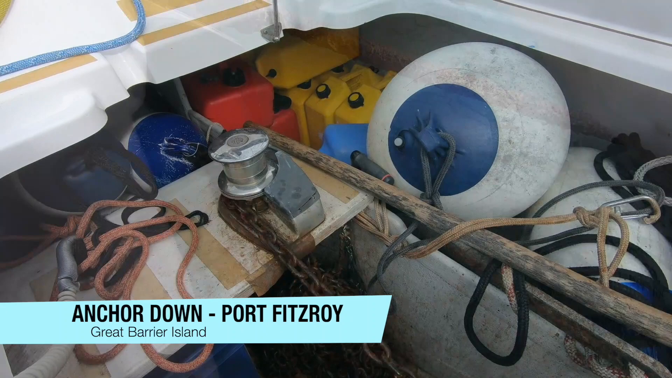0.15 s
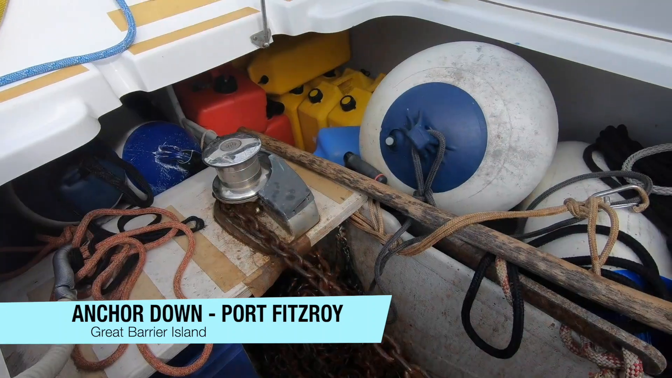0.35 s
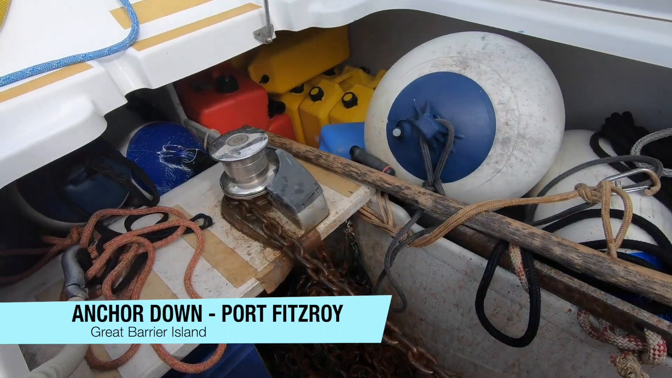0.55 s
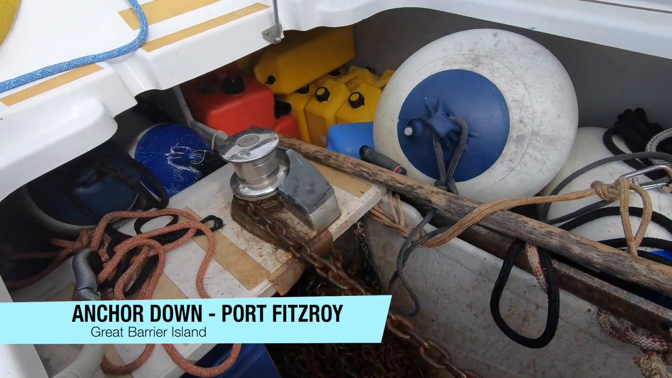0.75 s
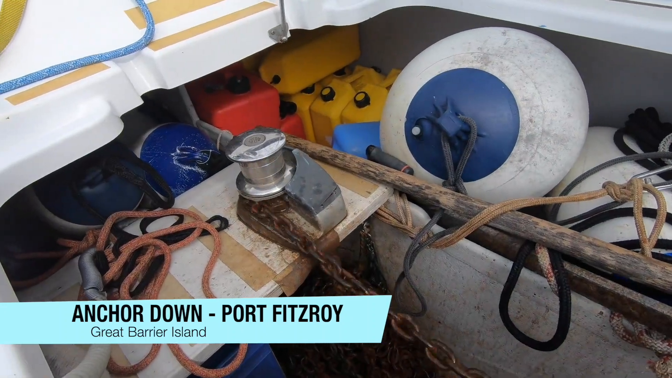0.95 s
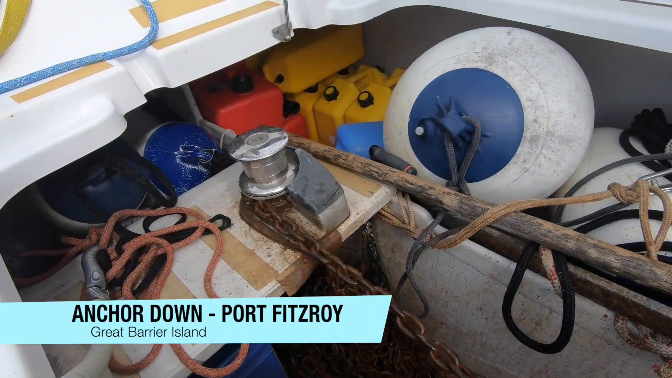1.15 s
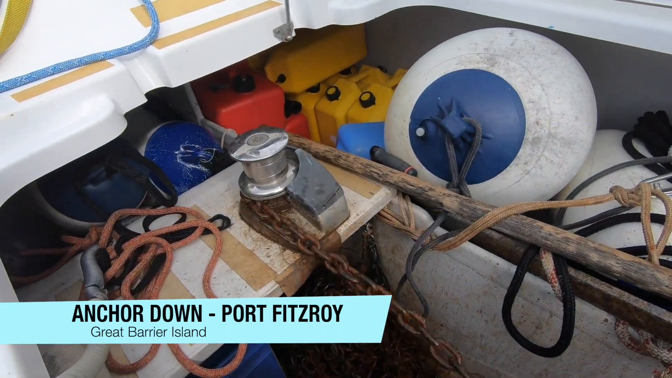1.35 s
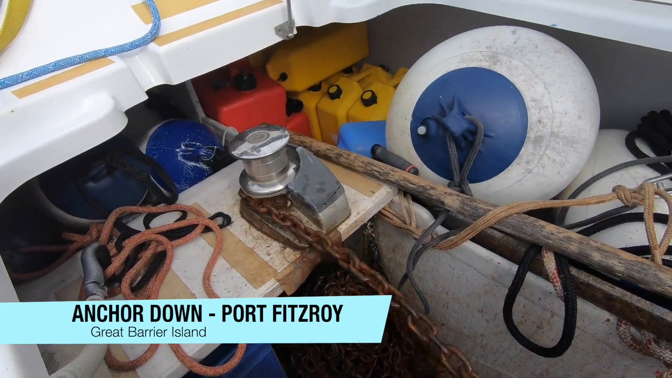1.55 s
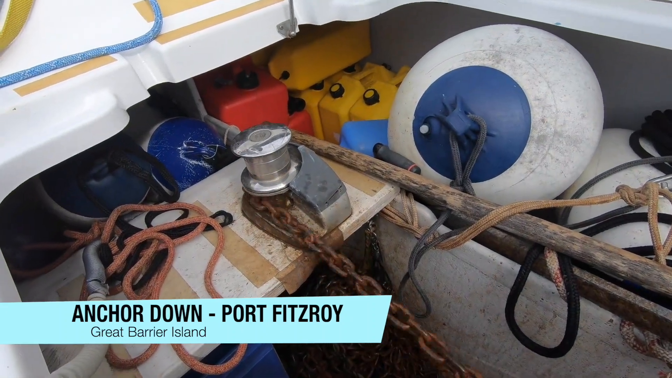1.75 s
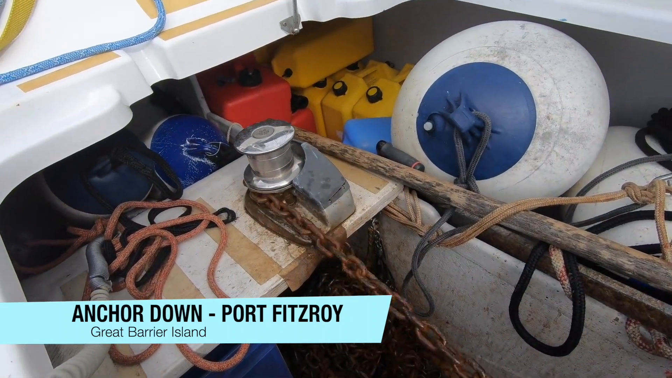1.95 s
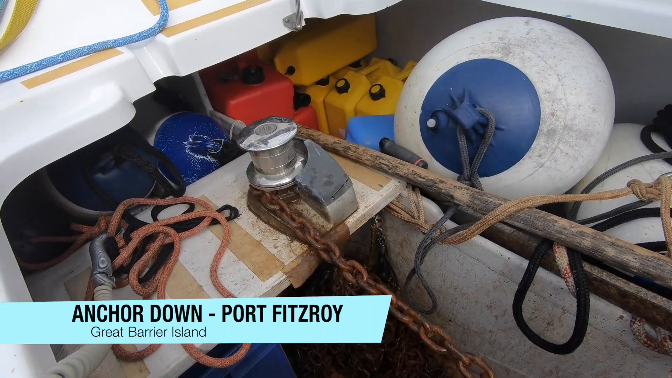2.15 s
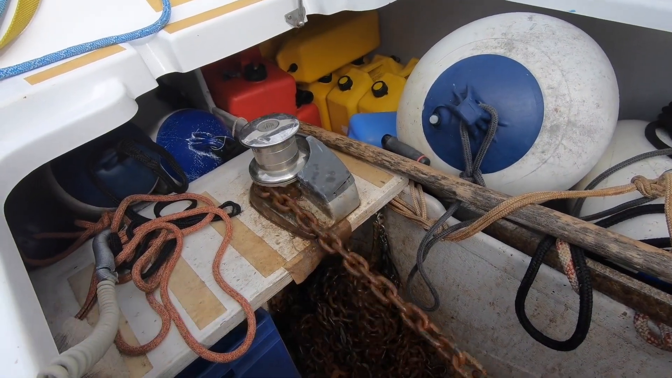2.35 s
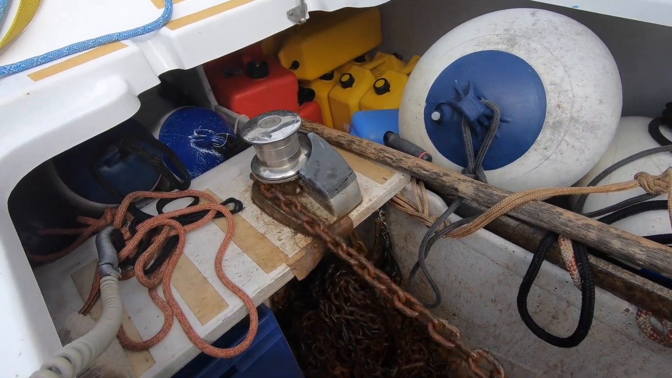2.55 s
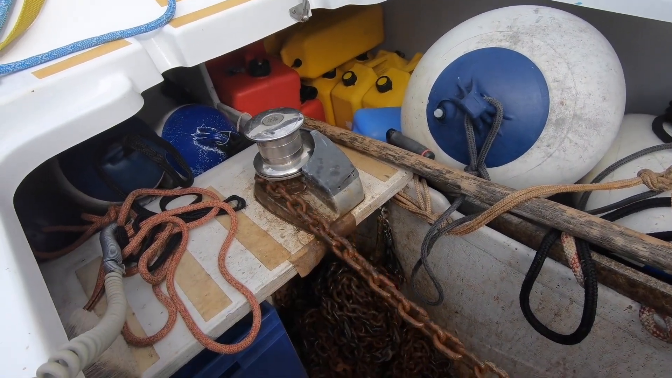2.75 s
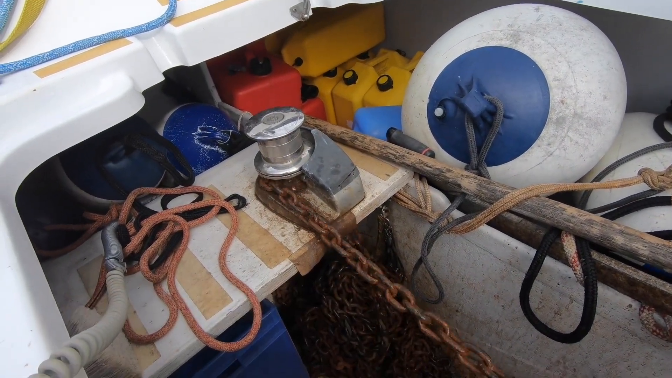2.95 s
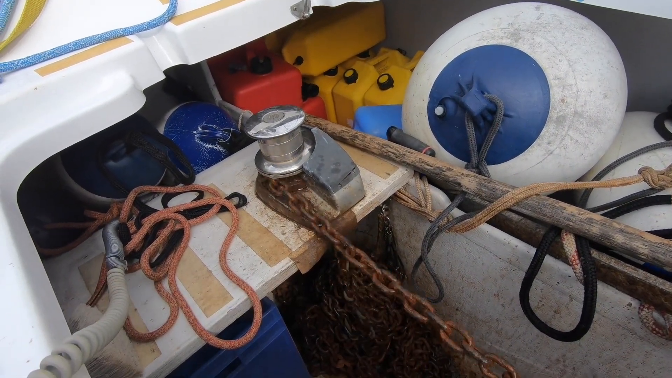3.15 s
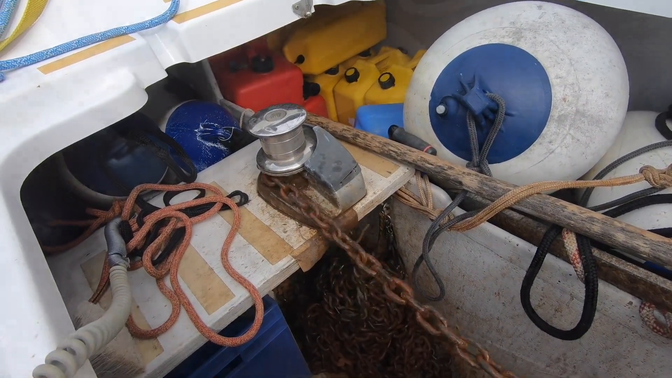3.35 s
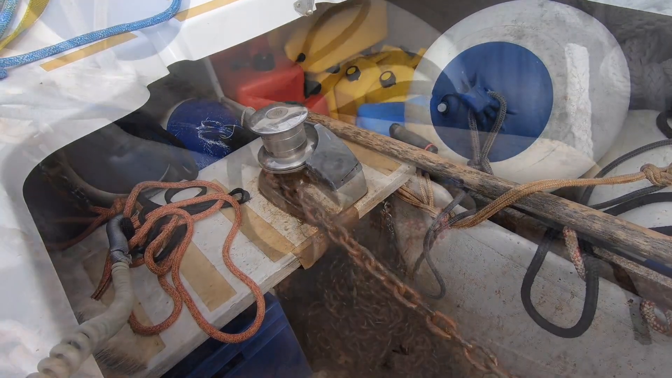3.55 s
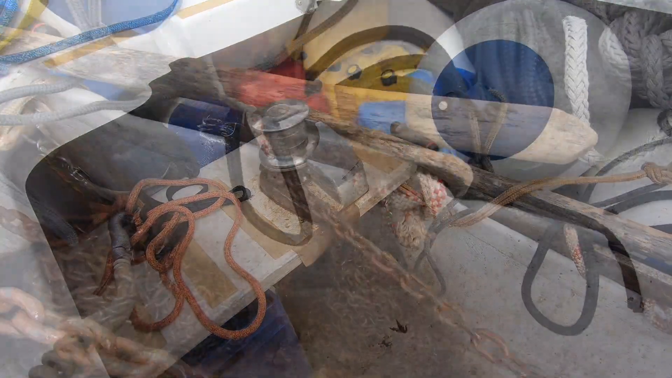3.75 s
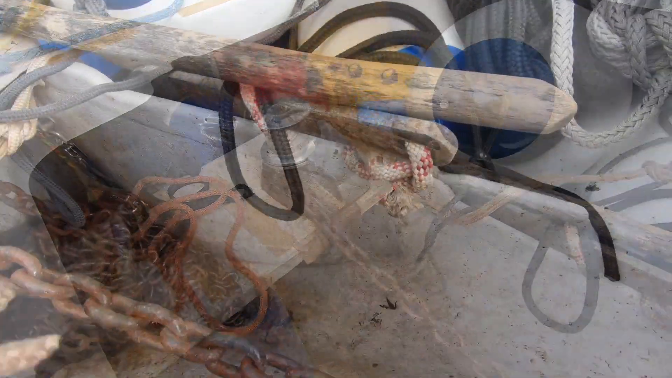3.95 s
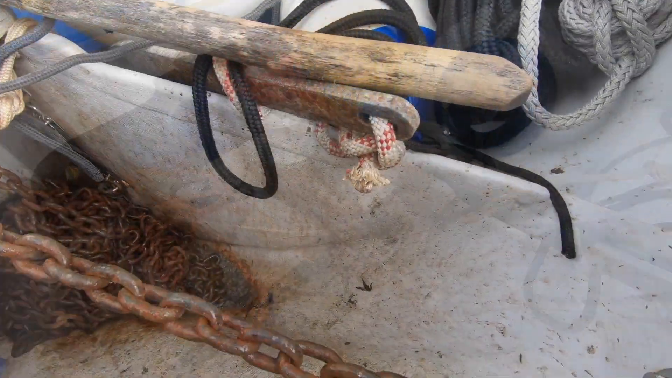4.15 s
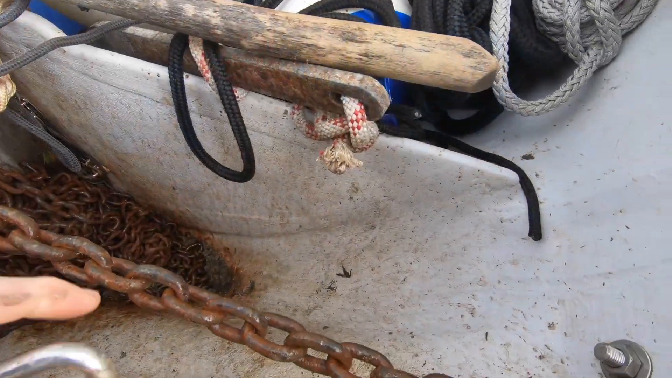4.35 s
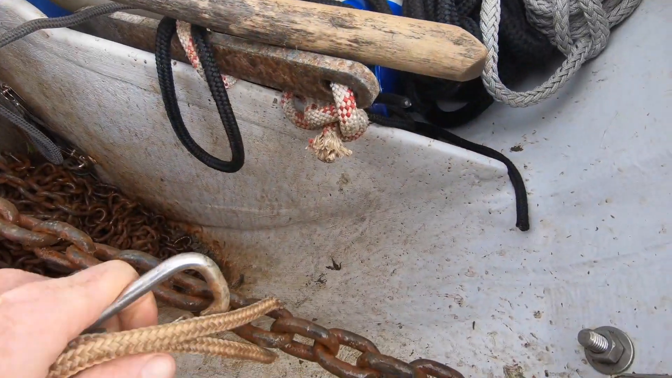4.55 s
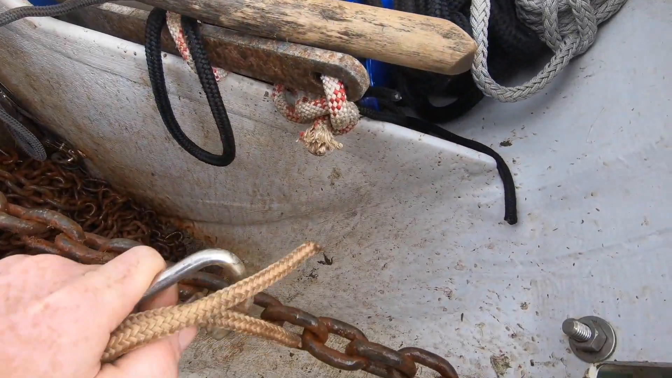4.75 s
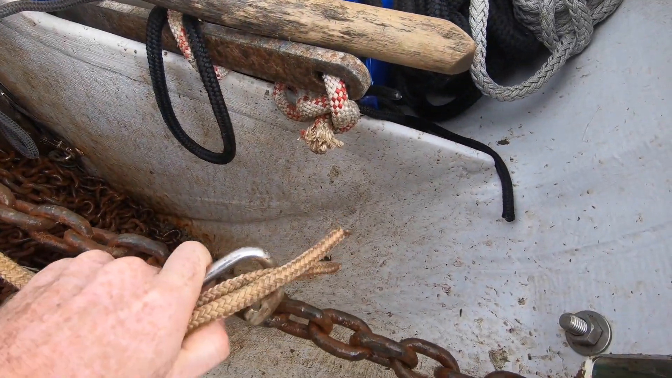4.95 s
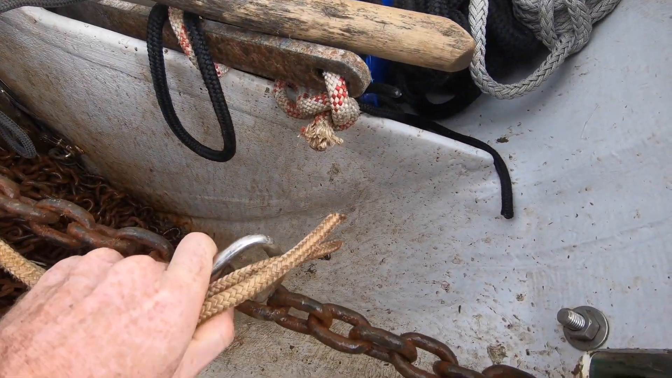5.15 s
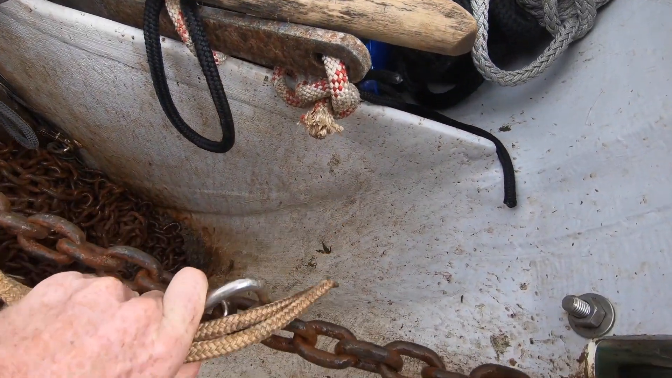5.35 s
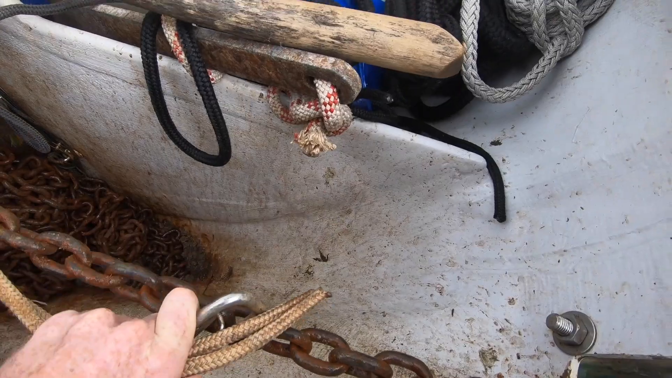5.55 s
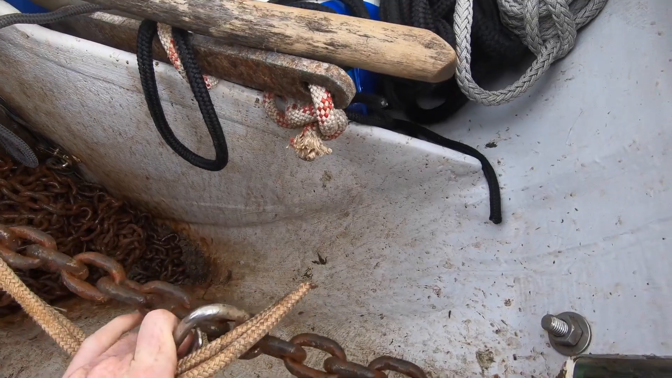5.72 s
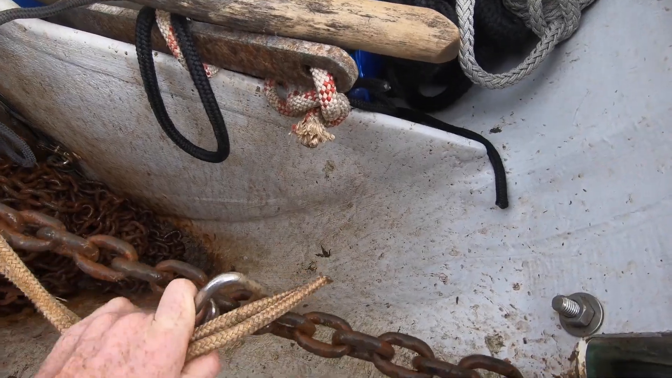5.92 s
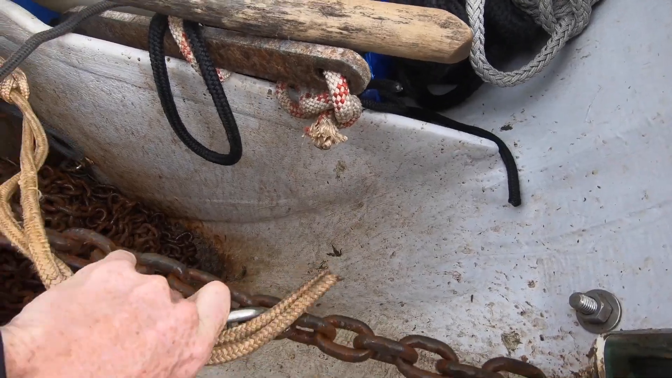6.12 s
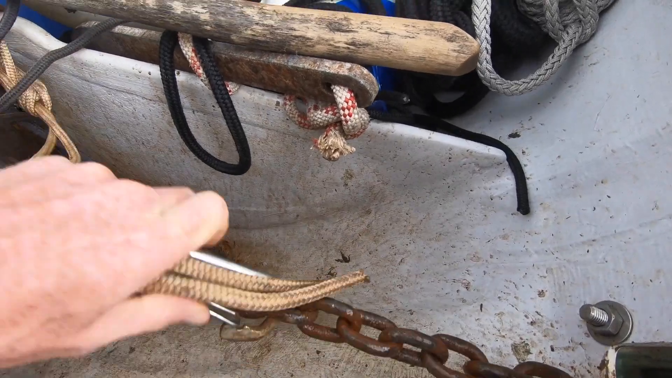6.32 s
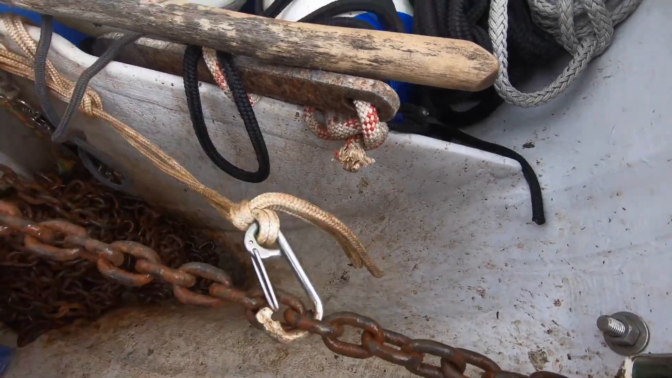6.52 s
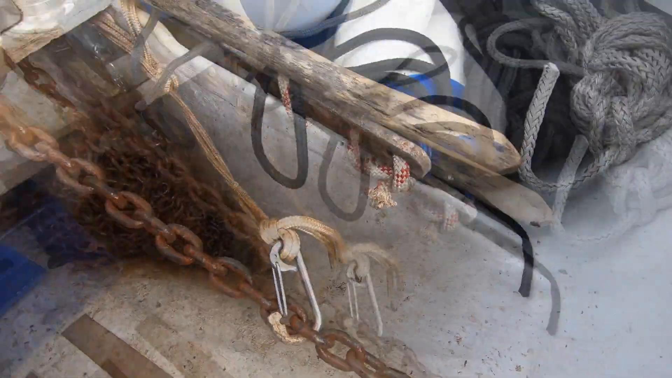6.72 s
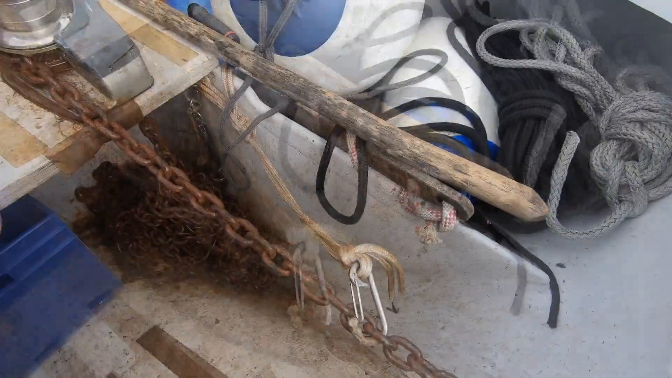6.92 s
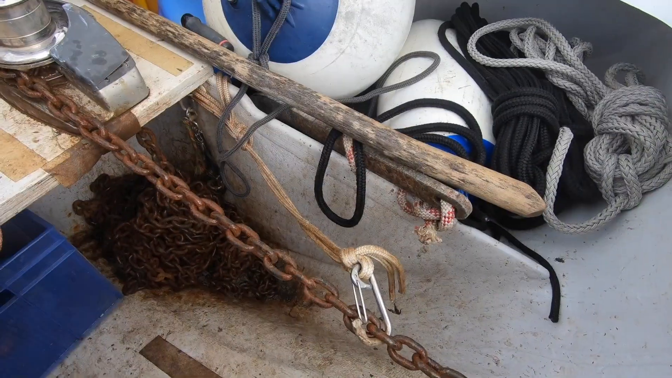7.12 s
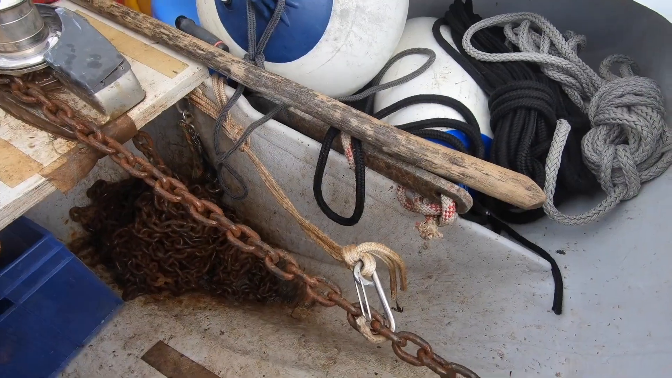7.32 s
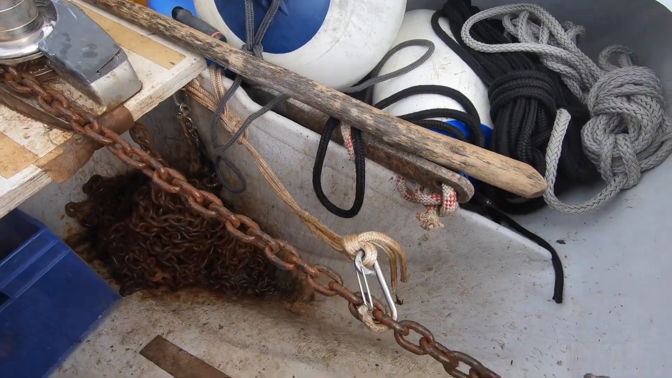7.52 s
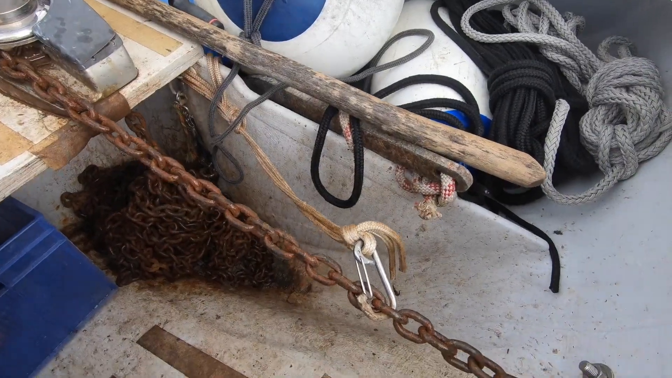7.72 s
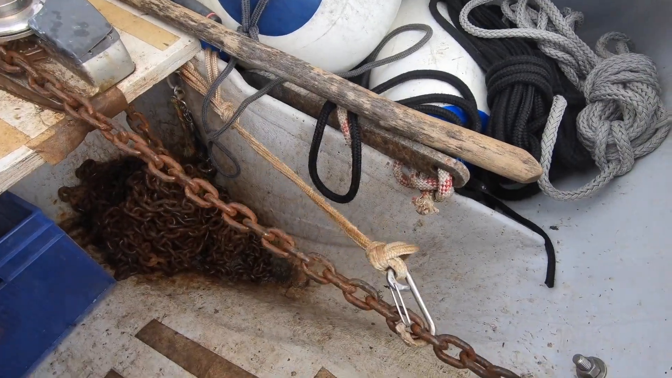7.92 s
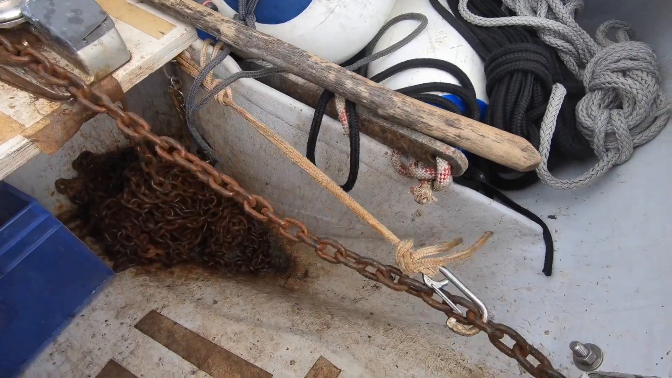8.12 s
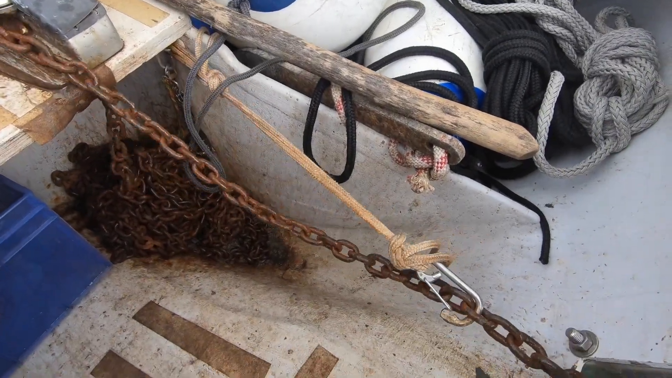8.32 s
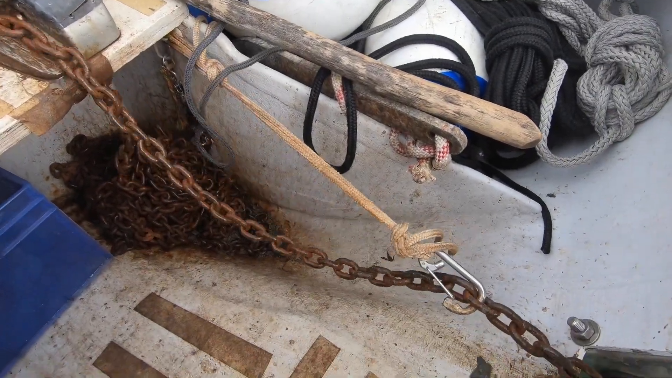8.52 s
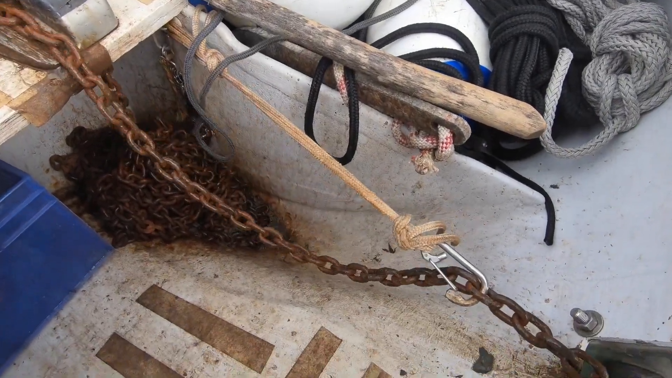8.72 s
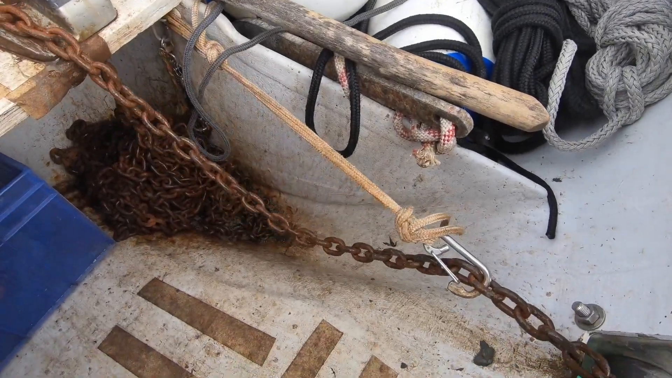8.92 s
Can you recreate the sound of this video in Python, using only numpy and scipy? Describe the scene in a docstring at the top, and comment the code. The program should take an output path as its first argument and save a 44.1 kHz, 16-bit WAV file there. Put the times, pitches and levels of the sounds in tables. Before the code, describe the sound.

Heavy chain rattles and knocks over a rumbling idle, slackens to rope rustle and a squeaky metal snap, then a motor whines and chain slides.

```python
"""Rusty anchor chain clatters and scrapes out of a boat's foredeck well, close below the microphone.
An electric windlass pays it out: links knock off the gypsy as struck modes, many small contacts
make the drag, and filtered noise booms in the hull with the humming motor over an idling engine.
In a pause rope rustles and a steel snap hook is clipped on with a squeak and a rattle of short rings;
then the motor whines up, and the chain runs again briefly and slides on."""
import sys
import numpy as np
from scipy import signal
from scipy.fft import rfft, irfft
from scipy.io import wavfile
from scipy.ndimage import uniform_filter1d, minimum_filter1d, map_coordinates

SR = 44100
rng = np.random.default_rng(int(sys.argv[2]) if len(sys.argv) > 2 else 0)


def store_wav(level_fs):
    """Save 16-bit WAV to argv[1]."""
    pcm = np.round(np.clip(np.atleast_2d(level_fs), -1, 1) * 32767)
    wavfile.write(sys.argv[1], SR, pcm.T.astype(np.int16))


N = 400413
TIME = np.arange(N) / SR
RING = np.arange(int(.3 * SR)) / SR  # time base of one struck sound

# the moving chain, one table a run: (t/s, relative drag level/dB, relative rusty scrape level/dB)
CHAIN_RUNS = [
    [(0, -20.5, -31), (.28, -24.5, -38.5), (.55, -21, -33.5), (1, -24, -36.5), (1.45, -20, -33.5),
     (2, -23.5, -37), (2.75, -24.5, -39), (3.3, -23, -35), (3.6, -28, -46), (3.85, -31, -48),
     (4.15, -38.5, -51.5), (4.4, -66, -72)],
    [(7.745, -54, -57), (7.78, -38, -53), (7.83, -27, -43), (7.92, -23, -41), (8.05, -20, -36.5),
     (8.19, -24, -38), (8.3, -27.5, -36), (8.45, -27.5, -38), (8.56, -28, -37), (8.66, -27.5, -37),
     (8.76, -29, -41), (8.87, -26.5, -43.5), (9.08, -32.5, -39.5)],
]
# the louder links strike gypsy, deck and each other:
# (t/s, then relative level/dB of thud, clack, gypsy ring, snap, crack)
LINK_KNOCKS = [(0.044, -33, -33, -22.5, -34, -56), (0.071, -39, -42, -57.0, -40.0, -34),
               (0.119, -24, -24.5, -23, -24.5, -32.5), (0.178, -27, -22, -31, -41, -56),
               (0.2, -26, -38, -55.0, -32.5, -41), (0.266, -26, -34, -56.0, -40, -43),
               (0.345, -22.5, -24, -31, -29.5, -29), (0.375, -27.0, -22, -21, -40, -58),
               (0.413, -23.5, -25, -33, -37.5, -54), (0.45, -16, -24, -40.0, -26.5, -30.5),
               (0.505, -26, -17.5, -27, -22, -27.5), (0.531, -29.5, -24, -30, -27, -44),
               (0.555, -36, -38, -42.0, -41, -47), (0.597, -20.5, -20.5, -40, -28.5, -34),
               (0.647, -25, -45, -55.0, -47, -54), (0.689, -34.0, -25, -23, -38, -53),
               (0.717, -24.5, -26.5, -22.5, -26.5, -33), (0.777, -21, -23.5, -42, -28, -35.5),
               (0.811, -19.5, -26, -47, -28.5, -34), (0.836, -18.5, -26, -32, -34, -39),
               (0.887, -30, -22, -24, -34, -52), (0.919, -18, -14.5, -23, -23, -32.5),
               (0.959, -24, -27, -38, -31, -31.5), (1.011, -26, -21.5, -19, -27, -44),
               (1.03, -27, -22, -22, -29, -40), (1.061, -30, -32, -48.0, -40, -38),
               (1.086, -33, -24, -29, -30.5, -57), (1.13, -21.5, -20, -30, -26.5, -32),
               (1.181, -31, -39, -56.0, -38, -36), (1.199, -40, -33, -56.0, -32, -39),
               (1.236, -21.5, -26, -28, -31, -36), (1.274, -30.5, -23.5, -26, -28, -55),
               (1.298, -24, -31, -48, -46, -40), (1.327, -27, -19.5, -24, -23.5, -41),
               (1.362, -39, -41, -44.0, -31, -46.5), (1.407, -31, -23, -27, -28, -39),
               (1.476, -21.5, -19.5, -27.5, -31, -42), (1.518, -33.0, -35, -49.0, -41, -43),
               (1.547, -29, -32, -45.0, -25.5, -28), (1.625, -32, -22, -26.0, -35, -57),
               (1.65, -17.5, -19.5, -20, -29, -30), (1.682, -23, -37, -45.0, -30, -37),
               (1.702, -29, -39, -52.0, -27.5, -34), (1.756, -18.5, -19.5, -36, -25.5, -31.5),
               (1.819, -27, -25, -21.5, -42, -58), (1.869, -24, -27, -40, -30, -34.5),
               (1.881, -21, -21, -27, -26, -33), (1.958, -26, -25, -20.5, -27.5, -49),
               (2.059, -29, -22.0, -25.5, -29.5, -60), (2.107, -23.5, -24, -46, -29.5, -32.5),
               (2.161, -25, -28.5, -44.0, -50, -43), (2.216, -20, -36, -46, -36, -37.5),
               (2.239, -24.5, -35, -44.0, -40, -38), (2.27, -32, -42, -57.0, -42, -47),
               (2.297, -23.5, -17, -37, -30, -53), (2.355, -42, -25, -38, -31, -37),
               (2.412, -23, -25.5, -44.0, -34.5, -50), (2.464, -35, -20, -20.5, -27, -43),
               (2.505, -21.5, -25, -42.0, -39, -49), (2.603, -30, -30, -42, -29.5, -34),
               (2.631, -36, -29, -41, -46, -55.0), (2.673, -21, -23.5, -46, -30.5, -31.5),
               (2.749, -35, -38, -47, -42, -42), (2.789, -35, -24.5, -25, -34, -44),
               (2.821, -28, -40, -49.0, -31.5, -38.5), (2.845, -20, -17.5, -37, -31.5, -40),
               (2.949, -30, -31, -49.0, -50.0, -53.0), (2.971, -17, -15.5, -40, -30.5, -34.5),
               (3.005, -24, -23, -26, -31, -31.5), (3.054, -43, -32, -42, -52, -58),
               (3.095, -27, -23.5, -35.0, -29.5, -29), (3.181, -27, -25.5, -41.0, -32.0, -36),
               (3.257, -21, -19.5, -35.0, -26, -34), (3.314, -47, -41, -49, -52, -37.5),
               (3.371, -22.5, -24, -41, -28, -28), (3.438, -42, -37, -47, -38, -50),
               (3.459, -39, -32, -56.0, -38.0, -39), (3.481, -40, -45, -55.0, -38, -49),
               (3.52, -34, -38, -49.0, -39, -39), (3.546, -21.5, -23.5, -45, -30.5, -55),
               (3.587, -27, -22.5, -41, -27.5, -38), (3.659, -31, -25, -31, -33.5, -50),
               (3.701, -23, -21.5, -39.0, -37.5, -48), (3.72, -25, -35, -47.0, -37, -37),
               (3.787, -34, -39, -55, -56.0, -65), (3.841, -41, -35, -52.0, -45, -58),
               (3.881, -30, -32, -41, -42.0, -47), (3.911, -36, -36, -50, -45, -59),
               (3.959, -32, -37, -54.0, -37, -41), (4.001, -41, -32, -31, -38, -50.0),
               (4.035, -24, -29, -45.0, -38, -41.5), (4.135, -48, -36.5, -40, -47, -56),
               (4.235, -53, -47, -45, -53, -68), (4.958, -59, -47.5, -64.0, -46, -51),
               (5.045, -49, -56, -72.0, -51, -53.0), (5.36, -32, -43, -59.0, -46, -51.0),
               (5.414, -23.5, -30.5, -42, -40, -58), (5.613, -32.5, -47, -61.0, -59, -69),
               (5.708, -27.5, -29, -46, -29.5, -43.5), (5.721, -25, -36, -51, -37, -56),
               (5.857, -27, -34.5, -55, -42, -47.5), (5.872, -33, -36, -57, -41, -46.5),
               (6.032, -28, -27.5, -45, -26, -28.5), (6.056, -21.5, -21, -34, -22.5, -24),
               (6.088, -24.5, -18, -25, -33, -54), (6.246, -42, -44, -43, -47, -46.5),
               (6.299, -36, -45, -57, -48, -35), (6.456, -39, -33, -44, -47, -61),
               (6.479, -28.5, -53, -57.0, -67, -67.0), (6.596, -45, -45.5, -67, -44.5, -61),
               (7.749, -38, -57, -66, -49, -60), (7.764, -27, -48, -59.0, -49, -57),
               (7.85, -20, -23, -44, -29, -41), (7.931, -18.5, -35, -45, -37, -51),
               (7.96, -20, -22, -36, -29.5, -36), (7.979, -23, -23, -42, -29, -34),
               (8.079, -19, -30, -42, -33, -34), (8.124, -17, -21.5, -32, -22, -36),
               (8.135, -23, -37, -39, -33, -50), (8.223, -26, -24, -41, -28, -33),
               (8.491, -30, -40, -53.0, -39, -35.5), (8.566, -23.5, -26.5, -46, -38, -40.0),
               (8.826, -23, -30, -44.0, -48, -45), (8.851, -21.5, -27.5, -39, -36, -49)]
# the bands of a knock's thud, clack, snap and crack, from edges f/Hz
KNOCK_FILTERS = [signal.butter(3, edges, "band", fs=SR, output="sos")
                 for edges in [(130, 800), (800, 2350), (2350, 4800), (4800, 16000)]]


def amp(db):
    """Amplitude factor of a level in dB."""
    return 10 ** (np.asarray(db) / 20)


def unit(x):
    """Scales x to unit RMS."""
    return x / np.sqrt(np.mean(x ** 2) + 1e-20)


def add(mix, s, sound):
    """Lays a sound into the mix from s seconds on."""
    part = mix[max(round(s * SR), 0):][:len(sound)]
    part += sound[:len(part)]


def delayed(x, s):
    """The same sound, s seconds later."""
    return np.pad(x, (max(int(s * SR), 0), 0))[:len(x)]


def level(rows, column=1):
    """Gain that follows a dB column, practically silent outside its rows."""
    rows = np.array(rows)
    return amp(np.interp(TIME, rows[:, 0], rows[:, column], left=-120, right=-120))


def envelope(start, length, rise_s, fall_s):
    """Attack, hold and release, curved over at the top."""
    hold_from = start + min(rise_s, length / 2)
    hold_to = start + max(length - fall_s, length / 2)
    edge = np.interp(TIME, [start, hold_from, hold_to, start + length], [0, 1, 1, 0])
    return edge * (2 - edge)


def colour(x, spectrum):
    """Filters x by a spectrum in minimum phase, without smearing attacks backwards."""
    hz, db = np.transpose(spectrum)
    f = abs(np.fft.fftfreq(4096, 1 / SR))
    log_gain = np.log(amp(np.interp(np.log(f + 1), np.log(hz), db)))
    taps = np.fft.ifft(np.exp(np.conj(signal.hilbert(log_gain)))).real
    return signal.oaconvolve(x, taps)[:len(x)]


def band(x, lo_hz, hi_hz, order=3):
    """Keeps the band between two frequencies."""
    return signal.sosfilt(signal.butter(order, [lo_hz, hi_hz], "band", fs=SR, output="sos"), x)


def wander(rate):
    """Smooth chance of unit size with rate random knots a second, held in steps of 64 samples."""
    knots = rng.standard_normal(2000)
    curve = map_coordinates(knots, [TIME[::64] * rate], order=3, mode="wrap")
    return unit(curve).repeat(64)[:N]


def ring(modes, scatter, uneven_db):
    """Dying modes; each blow excites them differently and detunes them a little."""
    hz, db, t60 = np.transpose(modes)[:, :, None]
    detune, strength, phase = rng.standard_normal((3, len(modes), 1))
    waves = np.sin(2 * np.pi * (hz * (1 + scatter * detune) * RING + phase))
    decay = np.exp(-np.log(1000) * RING / t60)
    return (amp(db + uneven_db * strength) * decay * waves).sum(0)


def contacts(count, per_s, spread_db):
    """Random metal contacts of very unequal size and either sign."""
    chance = rng.random(count)
    size = rng.exponential(1, count)
    sign = rng.choice([-1, 1], count)
    return (chance < per_s / SR) * sign * amp(spread_db * np.minimum(size, 4))


def landing(lead_s, fall_s, per_s):
    """Contacts swell as metal slides home (at lead_s), then die away."""
    since = RING - lead_s
    shape = np.exp(np.where(since < 0, 4 * since / lead_s, -since / fall_s))
    return contacts(len(RING), per_s, spread_db=2.0) * shape


def response(modes_db=-4, t60=0.13, early_db=-3, early_t60=0.016, scatter=0.0047):
    """One contact heard in the well: dense close reflections and the ring of windlass and deck."""
    # spectrum of the well's reflections: (f/Hz, relative level/dB per Hz)
    well_spectrum = [(120, -5.5), (200, 1), (400, 0.5), (1350, -4), (1520, -9), (1700, -4.5), (2100, -8.5),
                     (2350, -12.5), (4600, -17.5), (6650, -15.5), (7200, -28.5), (8300, -33), (9400, -45),
                     (11200, -101), (12500, -43), (16000, -44.5)]
    # windlass and deck ring: (f/Hz, relative level/dB, t60/s)
    body_modes = [(308, -4, .16), (398, -4, .13), (582, -5, .11), (709, -5, .12), (889, -3, .13),
                  (1005, -6, .1), (1095, -2, .1), (1230, -4, .1), (1385, -6, .09), (1660, -8, .1),
                  (1711, -5, .11), (1804, -7, .08), (1890, -6, .07), (2019, -5, .09), (2120, -7, .08),
                  (2605, -12, .07), (2830, -10, .07), (3330, -10, .07), (5220, -13, .09)]
    early = amp(early_db) * np.exp(-np.log(1000) * RING / early_t60)
    decay = early + np.exp(-np.log(1000) * RING / t60)
    echoes = colour(rng.standard_normal(len(RING)) * decay, well_spectrum)
    return unit(echoes) + amp(modes_db) * unit(ring(body_modes, scatter, uneven_db=5.5))


def clink(tone, rattle_s, tick, tick_s):
    """A small steel part rattles: each contact ticks and rings thinly; unit level over the first 25 ms."""
    click = band(rng.standard_normal(len(RING)), 2900, 7500, order=3) * np.exp(-RING / tick_s)
    blow = landing(.004, rattle_s, per_s=4000)
    sound = signal.fftconvolve(blow, tone + tick * click)[:len(RING)]
    return sound / (sound[:int(.025 * SR)].std() + 1e-9)


def travel():
    """Gain that follows the dragging chain through both runs."""
    return sum(level(run) for run in CHAIN_RUNS)


def motor_load(rise_s=0.061, fall_s=0.068):
    """The chain loads the motor in surges, each with a rounded envelope."""
    # (start t/s, length/s, relative level/dB)
    surges = [(0.04, 0.25, -25.5), (0.29, 0.28, -20), (0.592, 0.19, -20), (0.776, 0.43, -21.5),
              (1.253, 0.15, -29), (1.403, 0.24, -21.5), (1.64, 0.21, -18), (1.855, 0.19, -17.5),
              (2.03, 0.16, -21), (2.179, 0.25, -20), (2.573, 0.22, -17.5), (2.887, 0.3, -20),
              (3.197, 0.33, -20.5), (3.502, 0.25, -22.5), (3.722, 0.25, -26), (7.852, 0.16, -19.5),
              (7.998, 0.17, -17.5), (8.19, 0.32, -32.5)]
    return sum(amp(db) * envelope(start, length, rise_s, fall_s) for start, length, db in surges)


def dragging(drag_db=-2, scrape_db=-2):
    """Many small contacts at several places as the chain slides; rust adds a bright scrape."""
    # each run's motion, jolting first and then sliding smoothly:
    # (contacts per s at one place, their spread/dB, relative deck ring level/dB, unevenness/dB)
    motion = [(149.1, 4.5, -9, 0.75), (802, 2.5, -14, 1.5)]
    out = np.zeros(N)
    for run, (per_s, spread_db, modes_db, uneven_db) in zip(CHAIN_RUNS, motion):
        places = (signal.oaconvolve(contacts(N, per_s, spread_db), response(modes_db))[:N] for _ in range(4))
        rattle = sum(places)
        body = unit(band(rattle, 200, 2700))
        scrape = unit(band(rattle, 2600, 19000))
        slide = amp(drag_db) * level(run, column=1) * body
        slide += amp(scrape_db) * level(run, column=2) * scrape
        out += slide * amp(uneven_db * wander(rate=45))
    return out


def idling(rumble_db=-33, lumps_db=3):
    """The engine's unsteady orders in a lumpy low rumble, swelling and sinking together."""
    # engine orders: (f/Hz, relative level/dB)
    engine_orders = [(24.7, -41.5), (49.4, -39.5), (74.1, -37), (98.8, -43), (148.2, -42.5), (172.9, -46),
                     (222.3, -49.5), (296.4, -53)]
    # rumble spectrum: (f/Hz, relative level/dB per Hz)
    rumble_spectrum = [(8, -20.5), (25, 7.5), (38, -2.5), (75, 1.5), (120, -3.5), (155, -3), (200, -10),
                       (300, -19.5), (420, -32), (1000, -77.5)]
    # swell of the whole engine: (t/s, gain/dB)
    engine_swell = [(0, 1.5), (4.7, 2), (5.5, -1.5), (5.75, -5), (6.3, 3.5), (6.85, -3.5), (7.6, -1),
                    (8.3, -6), (9.08, -15)]
    orders = sum(amp(db) * np.sin(2 * np.pi * hz * TIME + 1.55 * wander(rate=7))
                 for hz, db in engine_orders)
    noise = colour(rng.standard_normal(N), rumble_spectrum)
    rumble = unit(noise * amp(lumps_db * wander(rate=25)))
    return (orders + amp(rumble_db) * rumble) * level(engine_swell)


def breeze():
    """A soft, steady wash of air and water around the boat: coloured noise under everything."""
    # (f/Hz, relative level/dB per Hz)
    air_spectrum = [(250, -4), (450, -7), (740, -5), (1010, -15), (1520, -12), (2620, -31.5), (3950, -20.5),
                    (6240, -32.5), (9290, -50.5), (12000, -49.5), (15600, -72)]
    return amp(-59.5) * unit(colour(rng.standard_normal(N), air_spectrum))


def hull(load, boom_db=-2, surge_db=-5):
    """Running chain and motor load shake the hull's low resonances; single bumps ring one panel."""
    # low resonances: (f/Hz, width/Hz, relative level/dB)
    hull_modes = [(48, 5.3, 1.5), (75.8, 11, -4.5), (114.9, 9.1, 0), (148.9, 9.9, -1), (175.9, 11.2, -3),
                  (209.7, 23, -9.5)]
    # hollow bumps on hull panels: (t/s, f/Hz, relative level/dB, t60/s)
    panel_bumps = [(2.099, 311.5, -16, 0.21), (3.1, 293, -14, 0.22), (5.259, 95, -11.5, 0.1),
                   (5.566, 125, -11, 0.045), (5.77, 284.5, -23, 0.26), (5.81, 218, -17, 0.14),
                   (6.04, 160, -12, 0.25), (6.107, 74.8, -16.5, 0.34), (6.502, 188, -6.5, 0.11),
                   (6.617, 141.7, -26.5, 0.2), (7.976, 313.5, -7.5, 0.19), (8.852, 393, -14, 0.18),
                   (8.845, 222, -15, 0.25)]
    # a panel's modes: (multiple of its pitch, relative level/dB)
    panel_modes = [(1, -3.5), (.72, -16), (1.45, -13.5), (2.1, -16.5)]
    shake = rfft(rng.standard_normal(N))
    f = np.fft.rfftfreq(N, 1 / SR)
    modes = sum(amp(db) / (1 + 1j * (f - hz) / width) ** 2 for hz, width, db in hull_modes)
    drive = np.hypot(amp(boom_db) * travel(), amp(surge_db) * load)
    out = unit(irfft(shake * modes, N)) * drive
    for s, hz, db, t60 in panel_bumps:
        swell = (1 - np.exp(-RING / 0.0048)) * np.exp(-np.log(1000) * RING / t60)
        panel = sum(amp(mode_db) * np.sin(2 * np.pi * (hz * k * RING + rng.random()))
                    for k, mode_db in panel_modes)
        add(out, s, amp(db) * np.sqrt(2) * swell * panel)
    return out


def knock(paths, thud, clack, gypsy, snap, crack, lead_s,
          thud_db=-1.5, clack_db=0.0, gypsy_db=-0.5, snap_db=0.0, crack_db=-1.0,
          chatter=0.41, chatter_s=0.011, build_s=0.0012, lag_s=0.001985, clang=0.92, clang_s=0.0054):
    """A link slides home, cracks and chatters; the low bands lag, the gypsy's ring builds up quickly."""
    # the gypsy rings when a link seats in it: (f/Hz, relative level/dB, t60/s)
    gypsy_modes = [(1703, -1, 0.13), (1642, -7.5, .06), (1803, -6.5, 0.089), (2018, -8.5, 0.055),
                   (2785, -9, 0.032)]
    attack = slice(int(lead_s * SR), int((lead_s + .02) * SR))
    blow = chatter * landing(lead_s, chatter_s, per_s=2200)
    blow[attack.start] = 1
    sounds = signal.fftconvolve(blow[None], paths, axes=1)[:, :len(RING)]
    burst = clang * band(rng.standard_normal(len(RING)), 1500, 3300, order=2) * np.exp(-RING / clang_s)
    tone = ring(gypsy_modes, scatter=0.012, uneven_db=2.5) + 2 * burst
    tone *= 1 - np.exp(-RING / build_s)
    parts = [signal.sosfilt(sos, sound) for sos, sound in zip(KNOCK_FILTERS, sounds)]
    parts.append(delayed(tone, lead_s))
    # order of parts: thud, clack, snap, crack, gypsy; each is levelled over its first 20 ms
    levels = thud + thud_db, clack + clack_db, snap + snap_db, crack + crack_db, gypsy + gypsy_db
    lags = lag_s, lag_s, 0, 0, 0
    return sum(amp(db) * delayed(part, lag) / part[attack].std()
               for part, db, lag in zip(parts, levels, lags))


def knocks(lead_s=.013):
    """The links land on spots that each ring a little differently; each band draws its own spot."""
    out = np.zeros(N)
    spots = np.array([response(modes_db=-7, scatter=.018) for _ in range(40)])
    for s, *levels in LINK_KNOCKS:
        paths = spots[rng.integers(len(spots), size=len(KNOCK_FILTERS))]
        add(out, s - lead_s, knock(paths, *levels, lead_s))
    return out


def motor(load, hum_hz=75.9, waver=0.0298, hum_db=3.0, second_db=-14, fourth_db=-20):
    """The windlass hum wavers and swells as the chain loads it; one groan creeps up in pitch."""
    turn = 2 * np.pi * np.cumsum(hum_hz * (1 + waver * wander(rate=17))) / SR
    hum = np.sin(turn) + amp(second_db) * np.sin(2 * turn) + amp(fourth_db) * np.sin(4 * turn)
    # the groan, under a heavier pull
    groan_at_s, groan_length_s, groan_hz, groan_hz_per_s = 0.94, 0.438, 112.6, 11.98
    pitch = groan_hz + groan_hz_per_s * (TIME - groan_at_s)
    groan = np.sqrt(2) * np.sin(2 * np.pi * np.cumsum(pitch) / SR)
    pull = amp(-20.5) * envelope(groan_at_s, groan_length_s, rise_s=0.037, fall_s=0.055)
    return amp(hum_db) * hum * load + groan * pull


def links(link_db=-13, rattle_s=0.0096, free_s=.003):
    """After each knock the link rings as it comes free; a sharper crack rings it more."""
    # a chain link rings: (f/Hz, relative level/dB, t60/s)
    link_modes = [(5400, -11.5, 0.015), (6380, 4.5, 0.062), (6300, -11, 0.08), (6650, 0, 0.032),
                  (8180, -19, 0.17), (15200, -24.5, .06), (15450, -24.5, 0.07)]
    out = np.zeros(N)
    for s, *_, crack in LINK_KNOCKS:
        tone = ring(link_modes, scatter=0.0083, uneven_db=6.5)
        sound = clink(tone, rattle_s, tick=0.73, tick_s=.009)
        add(out, s + free_s - .004, amp(crack + link_db) * sound)
    return out


def clonks(clonk_db=0, bounce=.3, bounce_s=.008, lead_s=.005):
    """A link grazes the boards, lands hard and bounces quickly, ringing the spot where it falls."""
    # hard drops, each spot with its own pitch: (t/s, f/Hz, level/dB)
    board_drops = [(.466, 990, -24), (.536, 1100, -24), (.837, 1050, -23.5), (.92, 626, -23),
                   (1.033, 1150, -25), (1.143, 550, -27), (1.36, 900, -27), (1.882, 950, -23),
                   (1.974, 640, -20.5), (1.987, 1094, -21.5), (2.074, 600, -27), (2.299, 1056, -20.5),
                   (2.847, 990, -26), (3.108, 620, -27), (3.195, 1070, -29), (3.26, 947, -17.5),
                   (5.414, 600, -30), (5.709, 1310, -25.5), (6.088, 680, -19), (6.093, 1200, -17.5),
                   (6.458, 650, -34), (7.852, 880, -20), (7.984, 1320, -26), (8.128, 856, -21.5)]
    # the boards' modes: (multiple of the spot's pitch, relative level/dB, t60/s)
    board_modes = [(.68, -6.5, 0.033), (.85, -6, .025), (1, 3, 0.026), (1.25, -3.5, .022),
                   (1.55, -10, .018)]
    out = np.zeros(N)
    for s, hz, db in board_drops:
        blow = bounce * landing(lead_s, bounce_s, per_s=1100)
        blow[int(lead_s * SR)] = 1
        modes = [(hz * k, mode_db, t60) for k, mode_db, t60 in board_modes]
        tone = ring(modes, scatter=.03, uneven_db=2)
        sound = band(signal.fftconvolve(blow, tone)[:len(RING)], 250, 3500, order=2)
        attack_level = sound[:int((lead_s + .018) * SR)].std()
        add(out, s - lead_s, amp(db + clonk_db) * sound / attack_level)
    return out


def rustle(rub_db=5.0, hiss_db=0.0, hush_low_db=-1, hush_high_db=-5.0, rise_s=0.17, fall_s=0.17):
    """Soft uneven rubbing and hiss while rope and hook are handled, over a faint hiss in the pause."""
    # spectrum of the rustle: (f/Hz, relative level/dB per Hz)
    rustle_spectrum = [(100, -4.5), (400, 0), (600, -0.5), (1000, -7.5), (2200, -7.5), (3700, -8),
                       (6500, -11), (7300, -16.5), (9000, -26), (10500, -48.5), (12500, -31),
                       (16000, -53.5)]
    # faint hiss in the pause: (t/s, relative level/dB)
    hush_rows = [(4.1, -62), (4.3, -54.5), (4.95, -52.5), (5.18, -57), (5.6, -50.5), (6.75, -49.5),
                 (6.9, -58), (7.0, -62.5), (7.2, -68.5), (7.8, -80.5)]
    # strokes: (start t/s, length/s, relative soft rub level/dB, relative hiss level/dB)
    rub_strokes = [(6.6, 0.12, -45, -43), (5.724, 0.3, -42, -47), (5.4, 0.06, -44, -46.5),
                   (5.8, 0.15, -44, -49), (6.53, 0.48, -61.5, -51.5)]
    low, high = (colour(noise, rustle_spectrum) for noise in rng.standard_normal((2, N)))
    rub = unit(band(low, 250, 1800, order=2))
    hiss = unit(band(high, 1600, 18000, order=2))
    soft = amp(hush_low_db) * level(hush_rows)
    bright = amp(hush_high_db) * level(hush_rows)
    for start, length, soft_db, bright_db in rub_strokes:
        stroke = envelope(start, length, rise_s, fall_s)
        soft = np.maximum(soft, amp(soft_db + rub_db) * stroke)
        bright = np.maximum(bright, amp(bright_db + hiss_db) * stroke)
    return (soft * rub + bright * hiss) * amp(1.6 * wander(rate=40))  # unevenness in dB


def hook(hook_db=0, tick=0.47):
    """The snap hook's gate clicks and its frame rattles on the chain."""
    # clicks and rattles on a link: (t/s, level/dB, rattle length/s)
    hook_snaps = [(6.038, -33, 0.013), (6.052, -22, 0.0048), (6.063, -22, 0.0094), (6.297, -30, 0.014),
                  (6.4, -37, 0.0054), (6.425, -43, 0.0035), (6.457, -46.5, 0.005), (7.977, -33.5, 0.011)]
    # the hook rings: (f/Hz, relative level/dB, t60/s)
    hook_modes = [(2200, -15, .03), (3350, -10, .035), (3760, -9, .065), (5416, -12, .07), (5600, -8, .045),
                  (5800, -8, .035), (6110, -6, .1), (6250, -8, .04), (6710, -11, .06), (7305, -16, .04),
                  (7730, -16, .04), (8400, -19, .035), (12700, -25, .05), (13300, -26, .04),
                  (15300, -27, .04)]
    out = np.zeros(N)
    for s, db, rattle_s in hook_snaps:
        tone = ring(hook_modes, scatter=.003, uneven_db=3)
        add(out, s - .004, amp(db + hook_db) * clink(tone, rattle_s, tick, tick_s=0.0081))
    return out


def squeak(at_s=6.037, length_s=0.024, hz=2210, squeak_db=-21.5, rasp=.7):
    """The hook's gate is forced over the link: steel sticks and slips in a brief, rasping tone."""
    tone = np.sin(2 * np.pi * hz * TIME + rasp * wander(rate=220))
    return amp(squeak_db) * unit(tone) * envelope(at_s, length_s, rise_s=.005, fall_s=.008)


def spin_up(start_s=7.757, length_s=0.23, whine_db=-32.5, mesh_hz=1950, settle_s=.069, flutter_db=3.5):
    """The motor gathers speed, then levels off; each gear line flutters and is blurred by the teeth."""
    # gear whine: (multiple of the mesh pitch, relative level/dB)
    gear_lines = [(.36, -3), (.72, -5), (1, -1), (2, -6.5)]
    speed = 1 - np.exp(-np.maximum(TIME - start_s, 0) / settle_s)
    turn = 2 * np.pi * np.cumsum(mesh_hz * speed) / SR
    blur = .95  # radians
    whine = sum(amp(db + flutter_db * wander(rate=110)) * np.sin(k * turn + blur * wander(rate=420))
                for k, db in gear_lines)
    shape = envelope(start_s, length_s, rise_s=0.025, fall_s=0.043)
    return band(whine, 180, 4400) * amp(whine_db) * shape


def scene():
    """Chain, machinery and the hands at work, heard from just above the well."""
    load = motor_load()
    chain = knocks() + clonks() + dragging() + links()
    boat = hull(load) + motor(load) + spin_up() + idling()
    return (chain + boat + hook() + squeak() + rustle() + breeze())[None]


def record(dry, ceiling=0.62, edge_hz=15850):
    """At the microphone a fast limiter holds down the loudest peaks; then the treble is cut off."""
    room = np.minimum(1, ceiling / (abs(dry) + 1e-9))
    gain = uniform_filter1d(minimum_filter1d(room, size=180), size=180)
    low_pass = signal.firwin(511, edge_hz, window=("kaiser", 9), fs=SR)
    return signal.oaconvolve(dry * gain, low_pass[None], "same")


dry = scene()
out = record(dry)
store_wav(out)
```